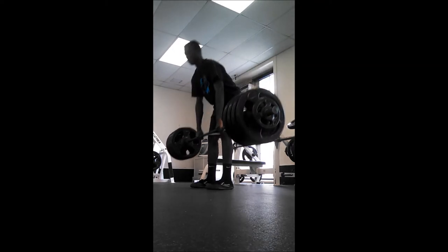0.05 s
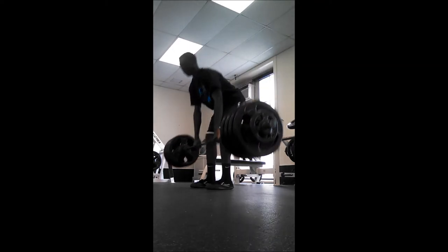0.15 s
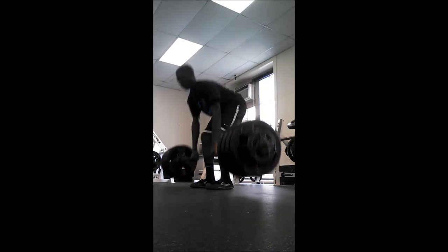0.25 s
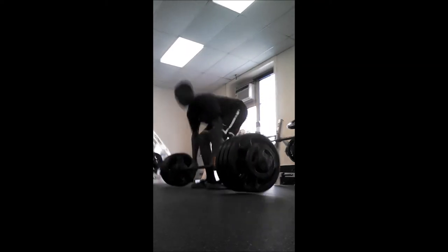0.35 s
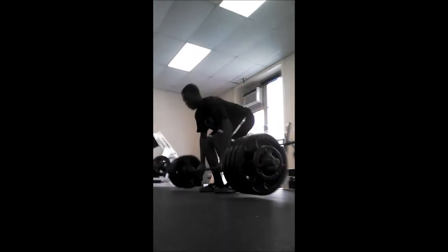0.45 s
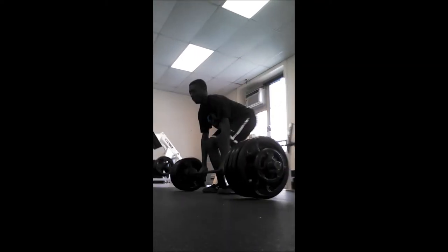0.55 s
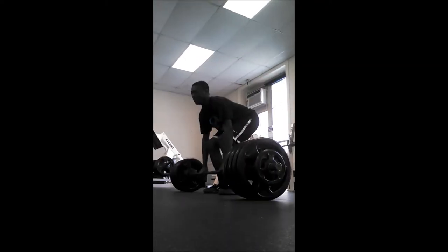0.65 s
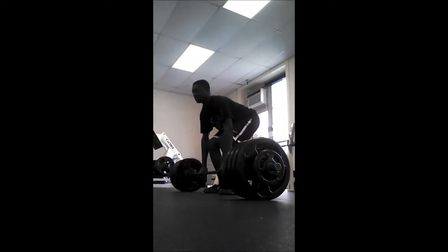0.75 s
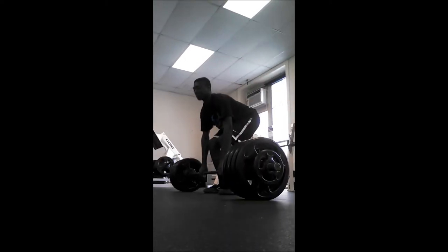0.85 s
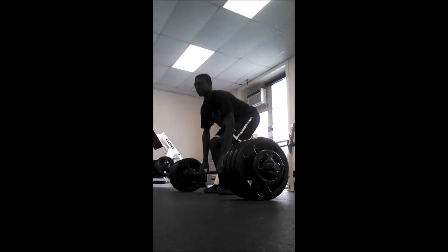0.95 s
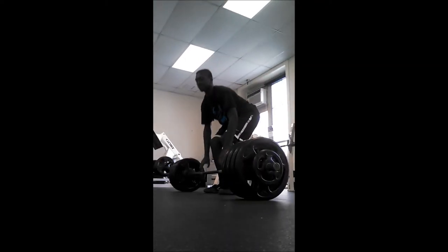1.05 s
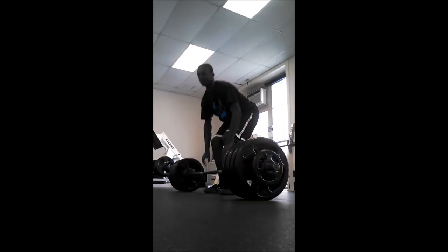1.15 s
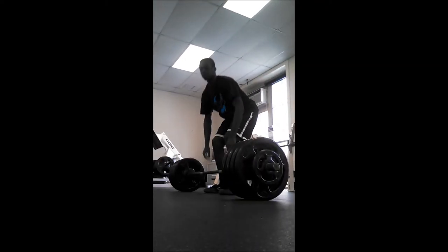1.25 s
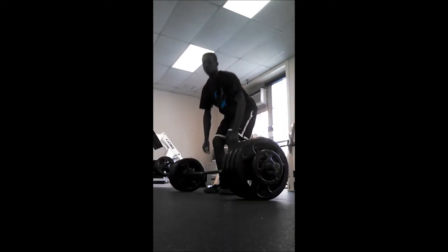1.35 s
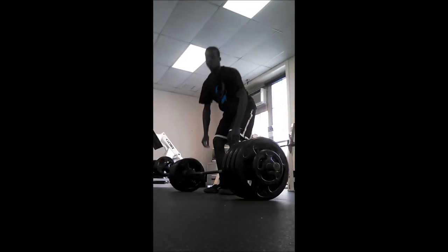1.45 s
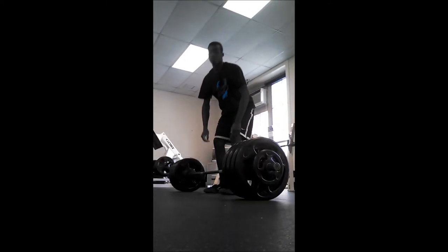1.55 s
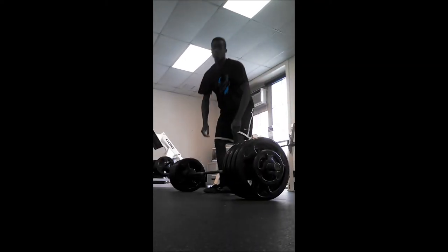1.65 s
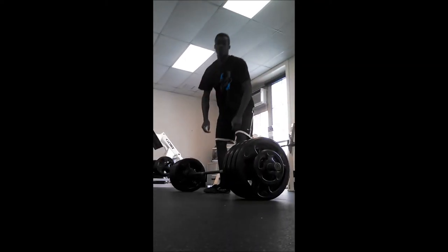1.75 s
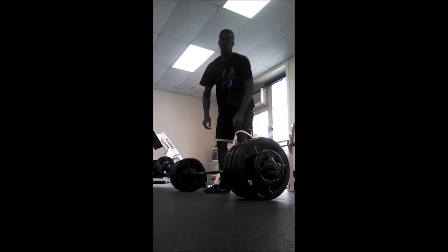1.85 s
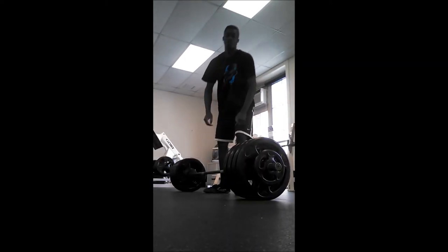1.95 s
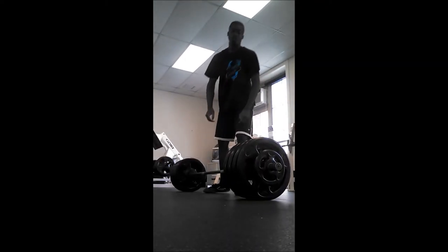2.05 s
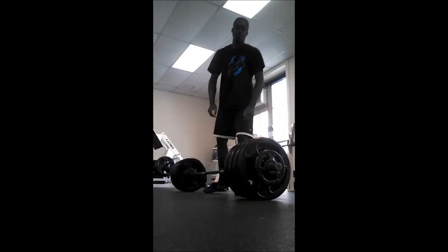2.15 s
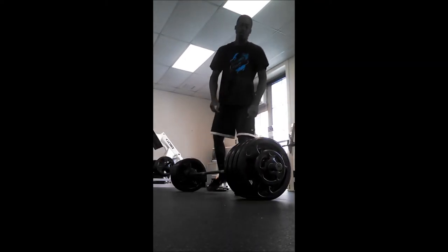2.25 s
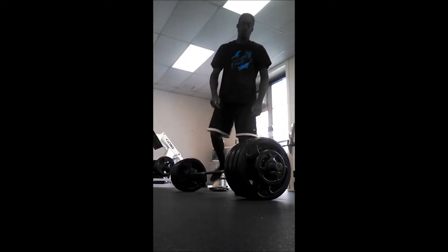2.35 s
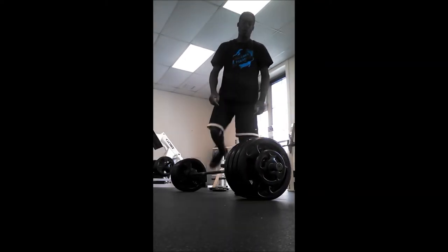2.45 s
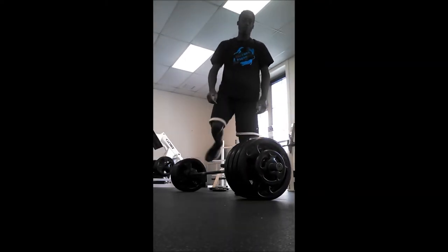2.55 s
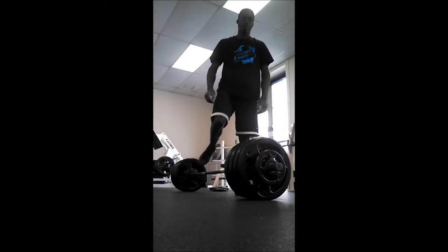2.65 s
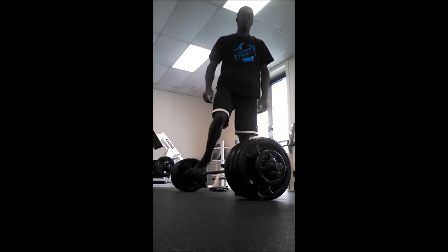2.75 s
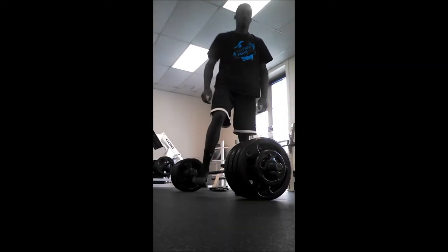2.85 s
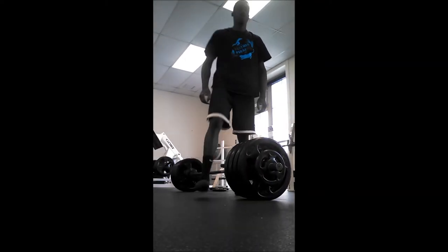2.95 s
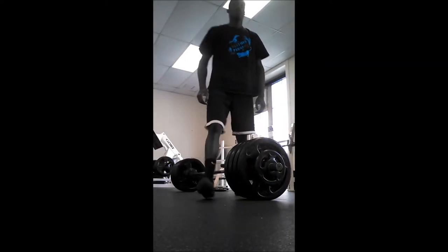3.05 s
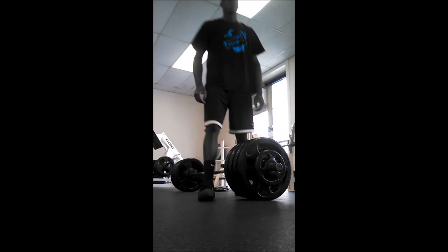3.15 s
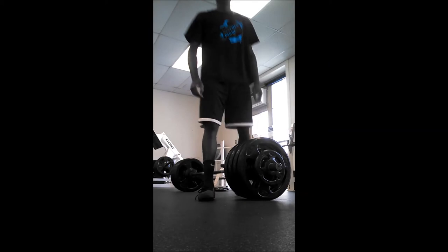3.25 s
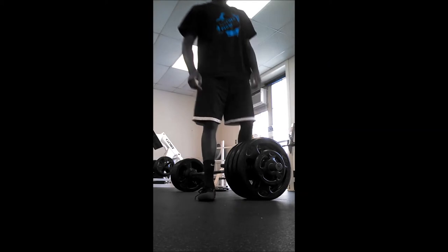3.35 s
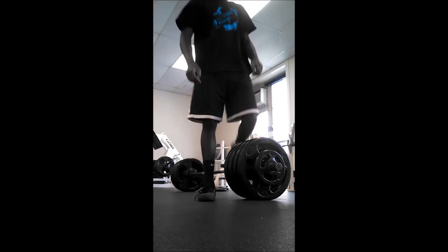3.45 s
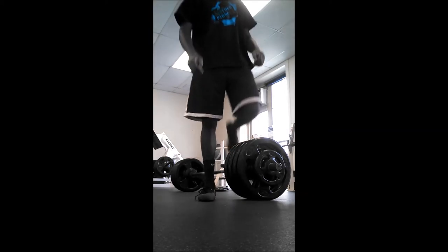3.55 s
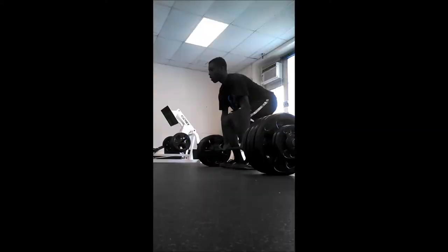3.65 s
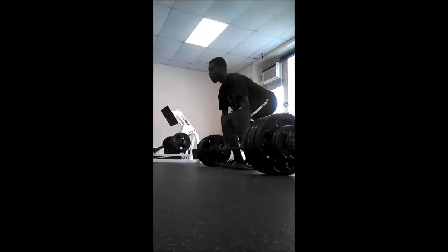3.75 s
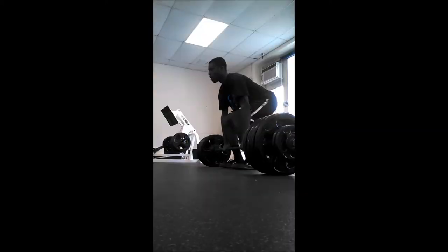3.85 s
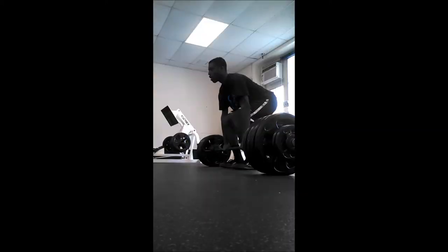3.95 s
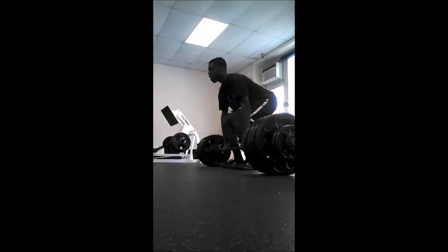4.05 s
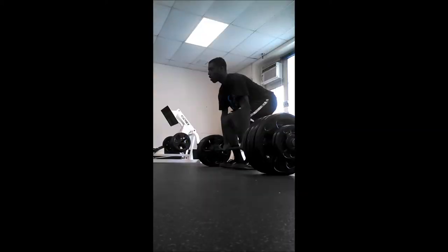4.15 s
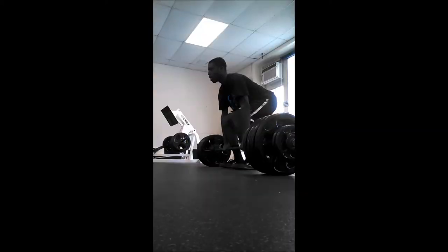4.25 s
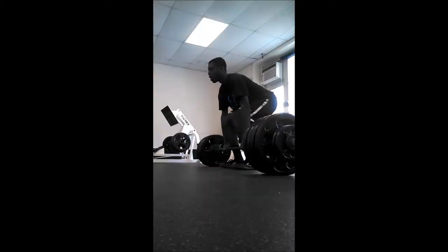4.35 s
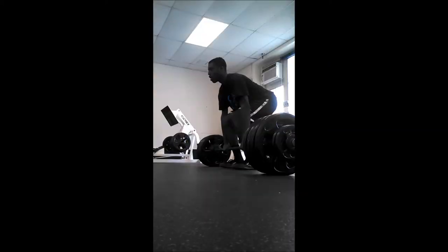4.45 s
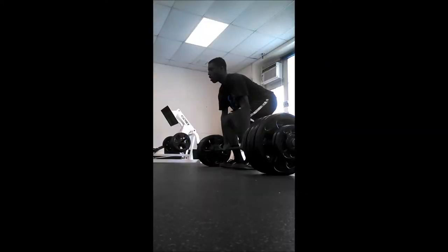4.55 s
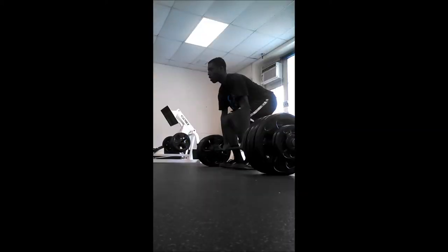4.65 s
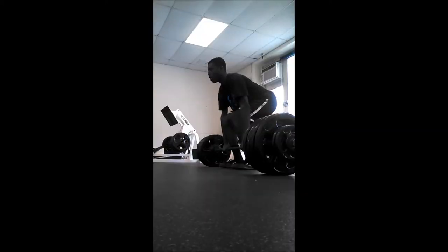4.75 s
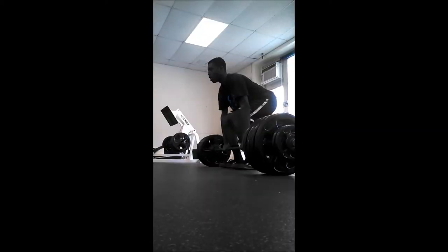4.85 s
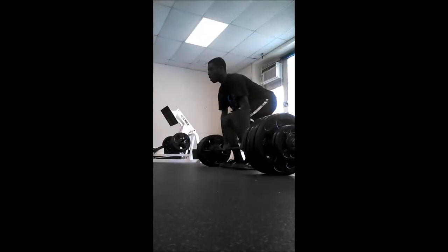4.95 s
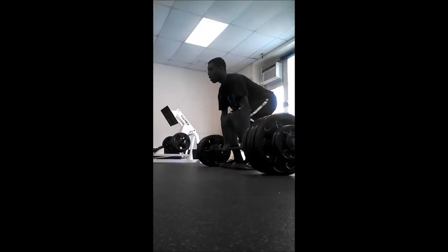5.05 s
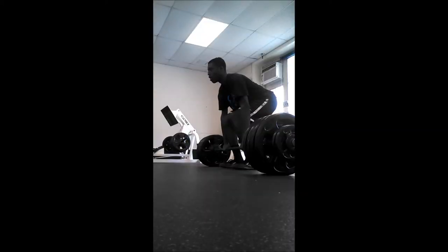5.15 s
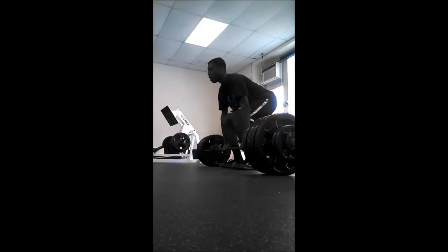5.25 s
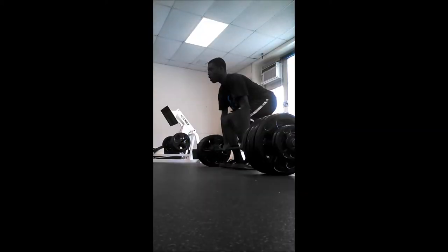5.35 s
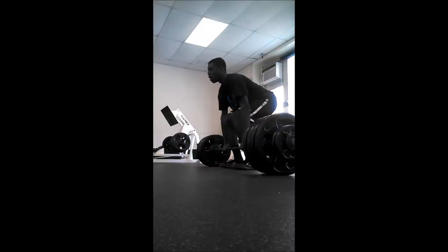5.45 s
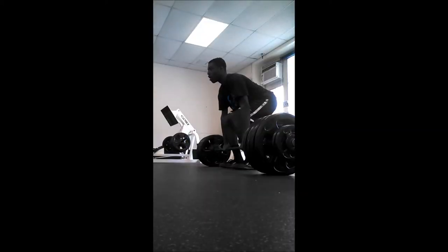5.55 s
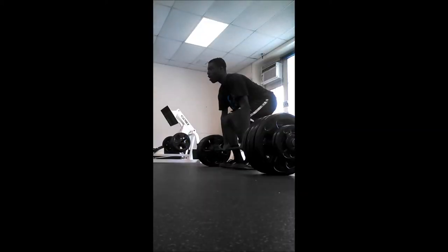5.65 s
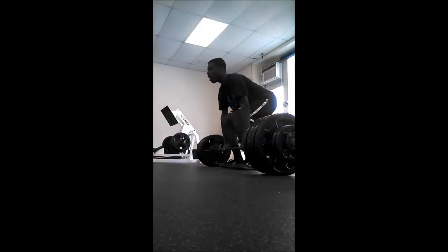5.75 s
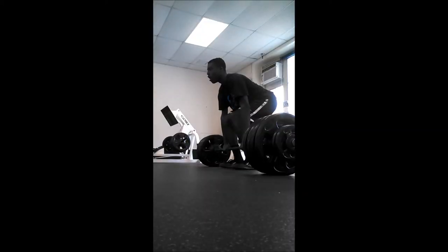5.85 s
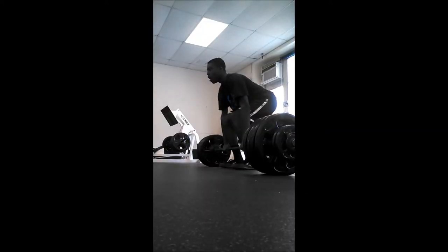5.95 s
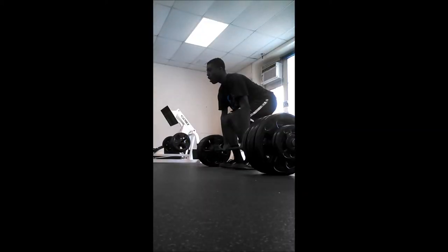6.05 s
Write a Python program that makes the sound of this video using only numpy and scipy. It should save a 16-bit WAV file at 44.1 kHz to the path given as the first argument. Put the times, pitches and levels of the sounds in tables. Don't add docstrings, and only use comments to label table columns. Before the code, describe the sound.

A distant air conditioner hums in a hard-walled gym. Almost at once a loaded barbell slams onto rubber matting, booming and clattering with iron plates as the nearby phone on the floor jumps and rocks. The hum drops away after the blow and slowly returns. A small click marks a change of scene; later the steel bar is knocked repeatedly, ringing and rattling until a grip damps it.

```python
import sys
import numpy as np
from scipy import signal
from scipy.fft import rfft, irfft, next_fast_len
from scipy.io import wavfile
from scipy.ndimage import uniform_filter1d

SR = 44100
rng = np.random.default_rng(int(sys.argv[2]) if len(sys.argv) > 2 else 0)


def invert_db(x):
    u = np.asarray(x, float) / 20
    return 10 ** u


def wav_out(sig):
    wavfile.write(sys.argv[1], SR, np.round(np.clip(np.atleast_2d(sig).T, -1, 1) * 32767).astype(np.int16))


N = 269451


def unit(x):
    return x / np.sqrt(np.mean(x ** 2) + 1e-20)


def along(points, hz, order=1):
    cols = np.transpose(points)
    return np.interp(np.log(hz + 1), np.log(cols[0] + 1), cols[order])


def filtered(x, response):
    m = next_fast_len(N + SR // 2)
    return irfft(rfft(x, m) * response(np.fft.rfftfreq(m, 1 / SR)), m)[..., :N]


def resonances(peaks):
    def response(f):
        total = 0
        for k, (c, w, db) in enumerate(peaks):
            total = total + (-1) ** k * invert_db(db) * 1j * f * w / (c * c - f * f + 1j * f * w)
        return total
    return response


def humps(peaks, broad):
    def response(f):
        power = invert_db(along(broad, f)) ** 2
        for c, w, db in peaks:
            power = power + invert_db(db) ** 2 * (f * w) ** 2 / ((c * c - f * f) ** 2 + (f * w) ** 2)
        cepstrum = irfft(np.log(power) / 2)
        cepstrum[1:len(f) - 1] *= 2
        cepstrum[len(f):] = 0
        return np.exp(rfft(cepstrum))
    return response


def gain_db(s):
    # start/s, sudden drop/dB, deepest/dB, time to sink/s
    ducks = [
        (.385, 5.5, 23, 0.86),
        (4.532, 12.5, 21, 0.66),
    ]
    grab_s, recover_db_per_s = .007, 9.5
    total = 0.44
    for start, drop_db, deep_db, sink in ducks:
        age = np.maximum(s - start, 0)
        u = np.minimum(age / sink, 1)
        sudden_db = drop_db * (1 - np.exp(-age / grab_s))
        sinking_db = (deep_db - drop_db) * (1 - np.cos(np.pi * u)) / 2
        climb_db = recover_db_per_s * np.maximum(age - sink, 0)
        total = total - np.maximum(sudden_db + sinking_db - climb_db, 0)
    return total


def add(track, s, db, sound):
    start = round(s * SR)
    track[..., start:start + sound.shape[-1]] += invert_db(db - gain_db(s)) * sound


def ports(pair, table):
    def alike(hz):
        return np.clip(along(table, hz, order=2), -1, 1)

    def shared(hz):
        lag = np.exp(-1j * 0.22 / (1 + (hz / 600) ** 2))
        return invert_db(along(table, hz)) * alike(hz) * lag

    def separate(hz):
        return invert_db(along(table, hz)) * np.sqrt(1 - alike(hz) ** 2)

    diff = filtered(pair[0], shared) + filtered(pair[1], separate)
    return np.array([pair[0] + diff, pair[0] - diff])


def gym(pair, wet_db):
    # f/Hz, t60/s
    room_t60 = [(100, 1), (1000, 0.65), (4000, 0.63), (12000, 0.48)]
    hz, t, z = signal.stft(rng.standard_normal((2, SR)), SR, nperseg=256)
    tail = signal.istft(z * invert_db(-60 * t / along(room_t60, hz)[:, None]), SR, nperseg=256)[1]
    tail = np.pad(tail / np.linalg.norm(tail[0]), ((0, 0), (150, 0)))
    return pair + invert_db(wet_db) * signal.fftconvolve(pair, tail, axes=1)[:, :N]


def air_conditioner(patchy_db=1.06):
    # f/Hz, level/dB per Hz
    airflow = [(25, -23), (60, -2.5), (90, 0.5), (140, -1), (220, -11.5), (350, -8.5), (550, -17.5),
               (1200, -23), (1800, -27.5), (3300, -41), (6500, -43), (8500, -48.5), (11500, -78),
               (15500, -94)]
    # f/Hz, width/Hz, level/dB
    motor = [(117.1, 3.1, -31), (178.06, 2.33, -17.5), (239.2, 6.2, -21.5), (357, 8, -43),
             (745, 2.5, -64.5), (927, 6, -50)]
    z = signal.stft(rng.standard_normal((2, N + 512)), nperseg=512)[2]
    field = uniform_filter1d(rng.standard_normal(z.shape[1:]), size=6, axis=0)
    field = uniform_filter1d(field, size=12, axis=1)
    noise = signal.istft(z * invert_db(patchy_db * unit(field)), nperseg=512)[1][:, :N]
    air = invert_db(-15) * unit(filtered(noise, lambda hz: invert_db(along(airflow, hz))))
    for hz, width, db in motor:
        line = unit(filtered(rng.standard_normal((2, N)), resonances([(hz, width, 0)])))
        swell = np.sqrt(np.abs(uniform_filter1d(line ** 2, size=9000)) + .1)
        air = air + invert_db(db) * line / swell
    return air


def bar():
    # t/s, peak level/dB, crack level/dB
    knocks = [(4.5351, 0.8, -9), (4.5672, -6, -12.5), (4.6296, -1.5, -10), (4.649, -5, -18),
              (4.6733, -2, -13), (4.74, -5.5, -22), (4.7845, -7, -20), (4.8269, -6, -9.5),
              (4.889, -5.5, -12.5), (4.975, -15, -10), (5.036, -20, -10)]
    # f/Hz, level/dB
    bar_modes = [(1180, -5), (1210, 2), (1624, -8), (1904, -4), (2229, -10), (2548, -10), (2884, -1.5),
                 (2981, -6), (3265, -7), (3400, -5), (3601, -5), (3642, -8), (4054, -4), (4466, -7),
                 (4908, -12), (5365, -5), (5815, 0), (6294, -5), (6785, -7), (7294, -4), (7790, -5),
                 (8320, -13), (8549, -13), (8855, -14), (9420, -14), (9945, -20), (10700, -9), (11350, -13),
                 (12460, -20), (12700, -22), (13270, -22), (14940, -31)]
    # f/Hz, t60/s
    bar_t60 = [(1000, 0.37), (4000, 0.31), (12000, .2)]
    # f/Hz, level/dB per Hz
    sleeve = [(500, -36), (1000, -21), (1400, -13), (2200, -15.5), (3300, -14.5), (5000, -20.5),
              (8000, -18.5), (9500, -49), (11000, -20.5), (12500, -32), (15500, -66)]
    rise_s, rattle_t60, crack_t60 = 0.0041, 0.32, 0.0058
    grip_s, grip_db_per_s = 4.95, 120

    out, shake = np.zeros((2, N + SR)), np.zeros((2, N + SR))
    t = np.arange(SR // 2) / SR
    hz, level_db = np.transpose(bar_modes)[:, :, None]
    fade = invert_db(level_db - 60 * t / along(bar_t60, hz))
    for s, db, crack_db in knocks:
        chance = rng.standard_normal((4, 2, len(bar_modes), 1))
        twin = 1 + .8 * np.sin(2 * np.pi * (22 + 8 * chance[2]) * t + 3 * chance[2])
        strength = invert_db(2.2 * chance[0])
        tone = np.sin(2 * np.pi * (hz + 6 * chance[3]) * t + 3 * chance[1])
        ring = np.sum(strength * fade * twin * tone, 1)
        gripped = invert_db(-grip_db_per_s * np.clip(s + t - grip_s, 0, t))
        swell = (1 - np.exp(-t / rise_s)) * gripped
        add(out, s, db - 21, ring * swell)
        rattle = swell * invert_db(-60 * t / rattle_t60)
        crack = invert_db(crack_db + 18 - 60 * t / crack_t60)
        add(shake, s, db + 8.5, (rattle + crack) * rng.standard_normal((2, len(t))))
    blurred = [(c, 26 + .002 * c, db) for c, db in bar_modes]  # (Hz, width Hz, dB)
    return gym(out[:, :N] + filtered(shake[:, :N], humps(blurred, sleeve)), wet_db=-6.0)


def plates():
    # t/s, level/dB rms, extra low clang/dB
    slaps = [(0.3823, -29.5, 18.5), (0.3883, -9.5, -0.5), (0.3991, -15, 0), (.407, -15.5, 2),
             (0.436, -28.5, -6.5), (.464, -29, -10), (.505, -30, -2.5), (.603, -28, -3), (.612, -26, -1.5),
             (.662, -33.5, 1), (0.7248, -30.5, -5), (0.7768, -34.5, -6), (0.817, -24.5, -1),
             (4.322, -37.5, -15), (5.726, -53, -25)]
    # f/Hz, width/Hz, level/dB
    iron = [(1135, 110, 0.5), (1348, 94, 6.5), (1594, 79, 5.5), (1780, 160, -1), (1840, 90, -9),
            (2960, 210, 11.5), (3250, 120, 6.5), (5700, 900, -2), (6400, 85, -12), (7320, 460, -13),
            (7900, 640, -14.5), (10000, 820, -11.5)]
    # f/Hz, level/dB per Hz
    crash = [(400, -44.5), (900, -4.5), (2000, -5.5), (4000, -7.5), (8000, 1), (11000, -22.5), (15500, -74)]
    loose_t60, pressed_t60, pressed_db = 0.22, 0.065, -19

    out, face = np.zeros((2, N + SR)), np.zeros((2, N + SR))
    t = np.arange(SR // 3) / SR
    for s, db, face_db in slaps:
        t60 = loose_t60 + (pressed_t60 - loose_t60) / (1 + invert_db(2 * (pressed_db - db)))
        noise = rng.standard_normal((2, 2, len(t)))
        spikes = invert_db(1.86 * rng.standard_normal(len(t) // 64 + 1).repeat(64)[:len(t)])
        chatter = noise * spikes * invert_db(-60 * t / t60) * (1 - np.exp(-t / 0.0011))
        add(out, s, db, chatter[0])
        add(face, s, db + face_db, chatter[1])
    low = filtered(face[:, :N], humps(iron[:5], [(700, -20.0), (1500, -15.5), (2600, -36.5)]))
    return gym(2.61 * (filtered(out[:, :N], humps(iron, crash)) + low), wet_db=-0.5)


def thuds():
    # t/s, level/dB
    booms = [(0.3835, -4.5), (.399, -7.5), (0.4152, -2.5), (0.4322, -15.5), (.455, -8.5), (0.6031, -14.5),
             (.735, -28.5), (4.6546, -16), (4.671, -28), (4.72, -25.5), (4.797, -25.5), (4.845, -27),
             (4.9, -23.5)]
    # t/s, level/dB, direction (+1 or -1)
    hops = [
        (.3819, -15.5, -1),
        (0.4171, 0.5, -1),
        (.4562, -12.5, 1),
        (4.655, -7.5, -1),
        (4.767, -25.5, -1),
        (4.845, -19.5, 1),
        (4.899, -25, 1),
    ]
    # t/s, level/dB
    rocks = [
        (0.4916, -5),
        (0.5327, -17),
        (0.6037, -15.5),
        (0.6416, -11.5),
        (.672, -15),
    ]
    blow_hz = 204.7
    edge_s, edge_db, edge_hz = .0097, -0.7, 150
    hop_boom_db, boom_jolt_db = -10.5, -13.5

    contacts = [(s, db + boom_jolt_db, db, blow_hz, -1) for s, db in booms]
    for s, db, way in hops:
        contacts.append((s, db, db + hop_boom_db, blow_hz, way))
    for s, db in rocks:
        contacts.append((s, db, db + hop_boom_db, blow_hz, 1))
        contacts.append((s + edge_s, db + edge_db, db + edge_db + hop_boom_db, edge_hz, 1))
    return contacts


def mat():
    # f/Hz, port difference/dB, its likeness to the sum (-1 to 1)
    floor_ports = [(30, -43, -0.046), (59.6, -4.5, 0.96), (140, -10, 0.3), (220, -7.5, -0.35),
                   (600, -4.5, -0.51)]
    out, jolts = np.zeros((2, N + SR)), np.zeros(N + SR)
    t = np.arange(SR // 8) / SR
    for s, jolt_db, boom_db, hz, way in thuds():
        turn = np.pi * np.clip(hz * t, 0, 1)
        rumble = unit(signal.lfilter([1], [1, -1.96, .9606], rng.standard_normal((2, len(t)))))
        shudder = rumble * invert_db(-60 * t / .15) * (1 - np.exp(-t / .004))
        push = np.sign(way) * np.sin(turn) ** 2
        jolt = np.sign(way) * np.sin(2 * turn) * np.sqrt(np.abs(np.sin(turn)))
        add(out, s, boom_db + 16, push * [[1], [0]])
        add(out, s, max(jolt_db, boom_db) + 2.0, shudder)
        add(jolts, s, jolt_db + 0.5, jolt)

    def thin(f):
        return (1j * f / (55 + 1j * f)) ** 2

    boom = gym(filtered(out[:, :N], thin), wet_db=-10)
    return ports(boom, floor_ports) + filtered(jolts[:N], thin) * [[1], [-1]]


def scene():
    # f/Hz, port difference/dB, its likeness to the sum (-1 to 1)
    air_ports = [(29.65, -15.5, .1), (61.2, -13, 0.24), (200, -16.5, 0.91), (400, -20, 0.18),
                 (800, -13, 0.51), (1200, -4.5, -0.57), (1900, 2.5, -0.8), (2600, -0.8, -0.67),
                 (3370, 1, 0.75), (8500, -0.5, 0.6), (10280, -0.5, -0.36)]
    return ports(air_conditioner() + plates() + bar(), air_ports) + mat()


def band_limit(x):
    return signal.sosfilt(signal.butter(12, 15720, fs=SR, output="sos"), x)


def record(dry):
    port_delay = 16
    change_s = 3.705
    x = (dry - np.roll(dry[::-1], port_delay, axis=1)) / 2
    t = np.arange(N) / SR
    ducking = np.clip((gain_db(t - .25) - gain_db(t) - 2.5) / 3, 0, 1)
    flutter = unit(uniform_filter1d(rng.standard_normal((2, N)), size=50))
    x = x * invert_db(gain_db(t) + .7 * ducking * flutter)
    x = x / (1 + np.abs(x / .98) ** 6) ** (1 / 6)
    x = filtered(x, lambda hz: (hz < 15150) / (1 + (hz / 13500) ** 8))
    click = np.where(t >= change_s, np.exp(-np.abs(t - change_s) / 0.00049), 0)
    x = x + click * [[-.2], [-.12]]
    return band_limit(x)


dry = scene()
out = record(dry)
wav_out(out)
```